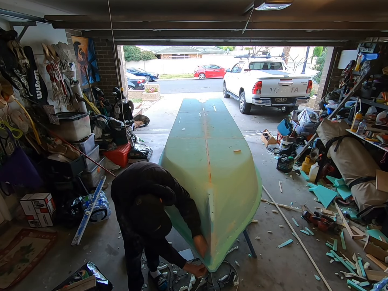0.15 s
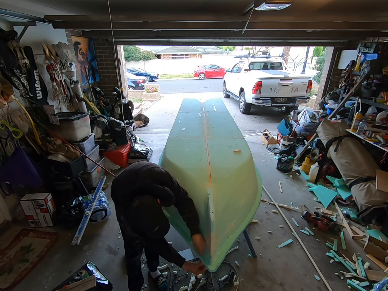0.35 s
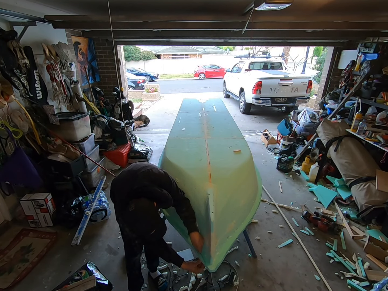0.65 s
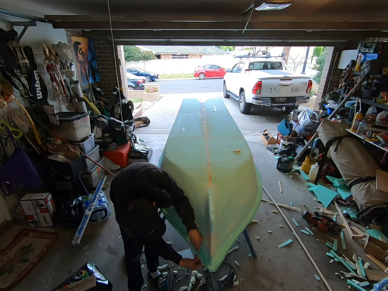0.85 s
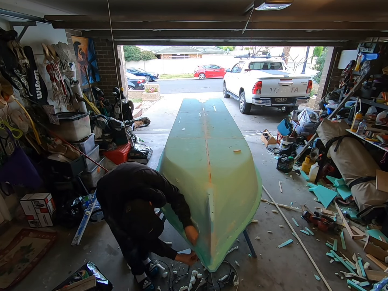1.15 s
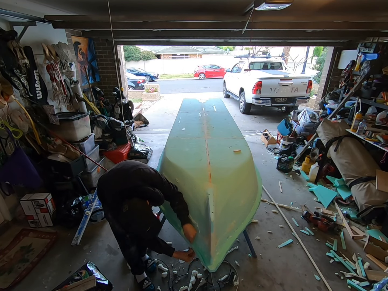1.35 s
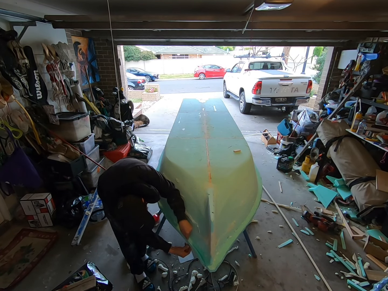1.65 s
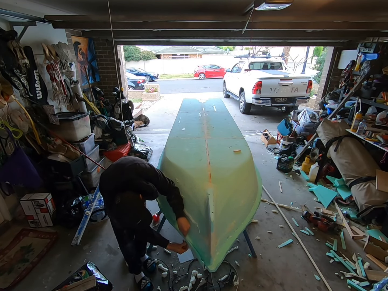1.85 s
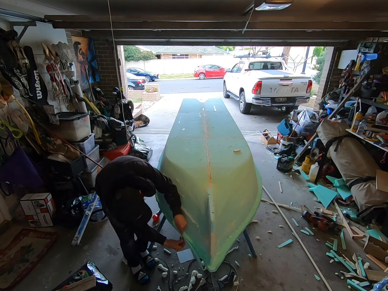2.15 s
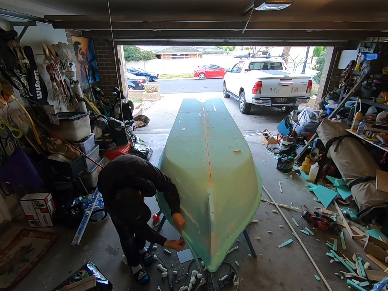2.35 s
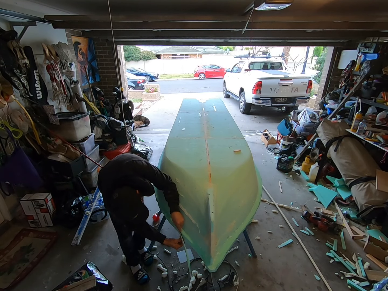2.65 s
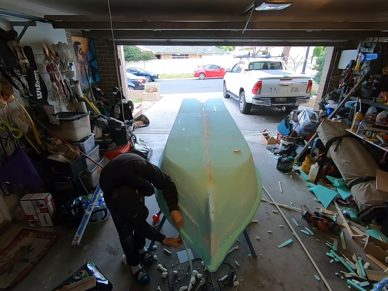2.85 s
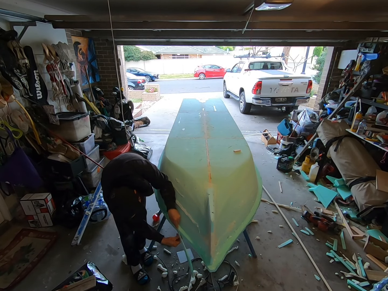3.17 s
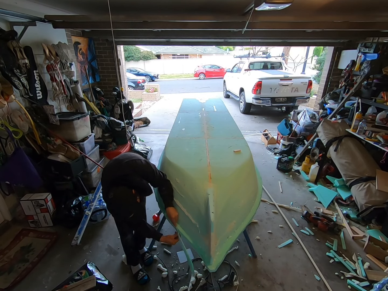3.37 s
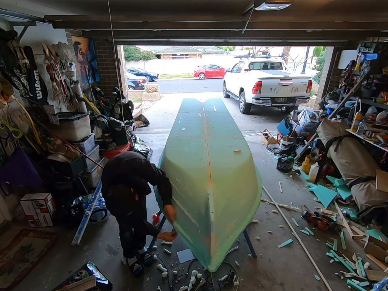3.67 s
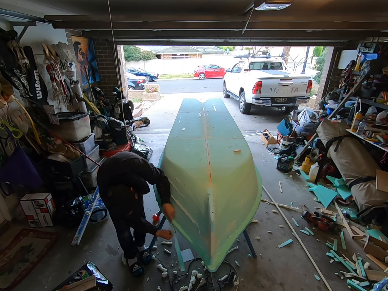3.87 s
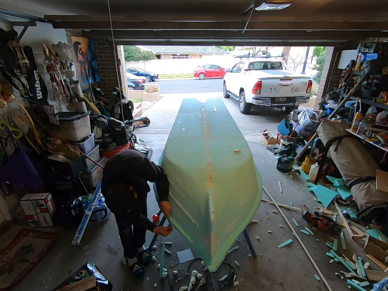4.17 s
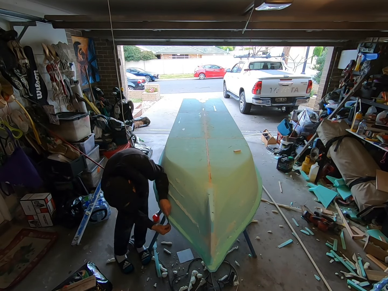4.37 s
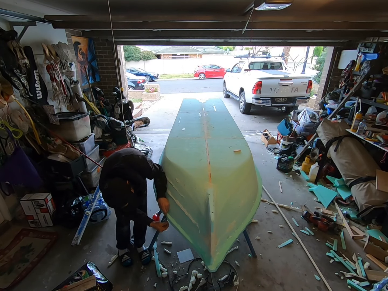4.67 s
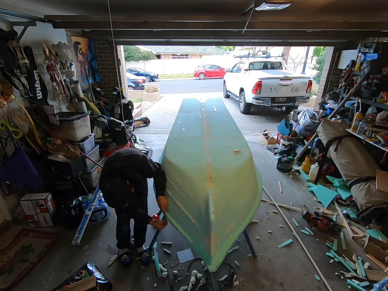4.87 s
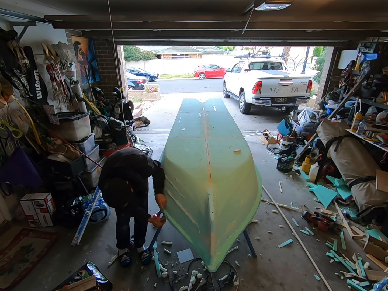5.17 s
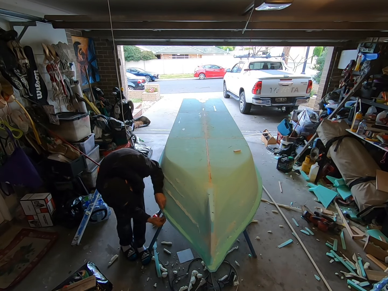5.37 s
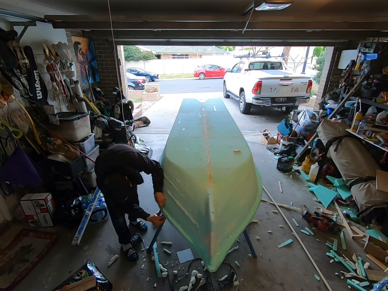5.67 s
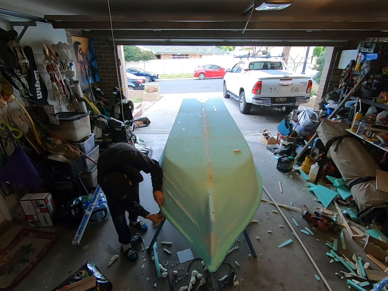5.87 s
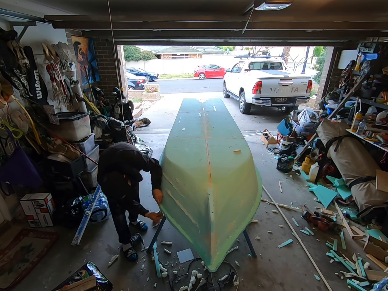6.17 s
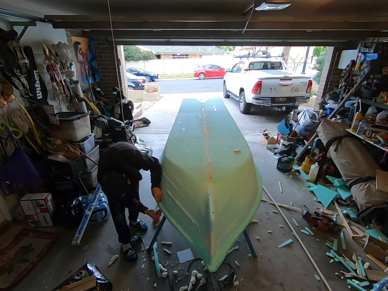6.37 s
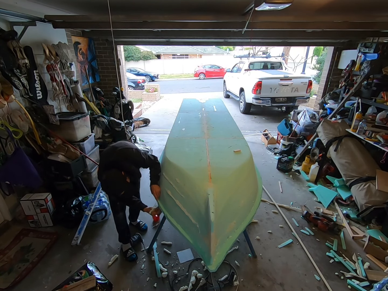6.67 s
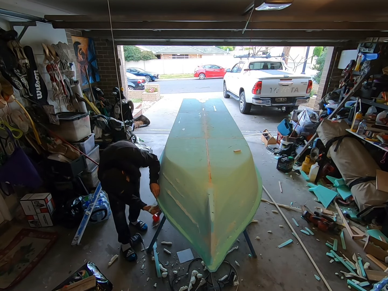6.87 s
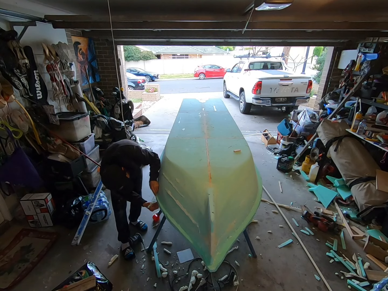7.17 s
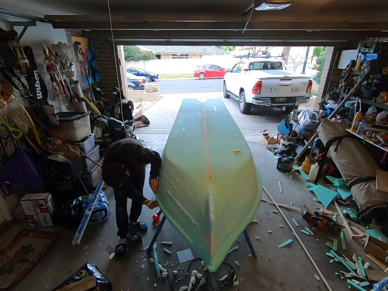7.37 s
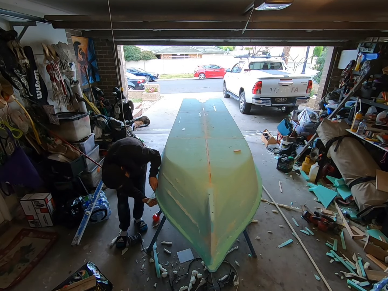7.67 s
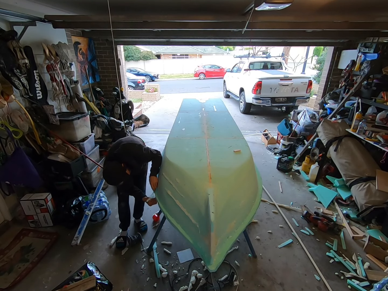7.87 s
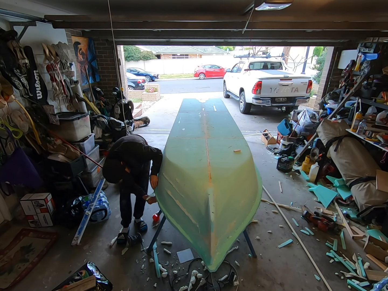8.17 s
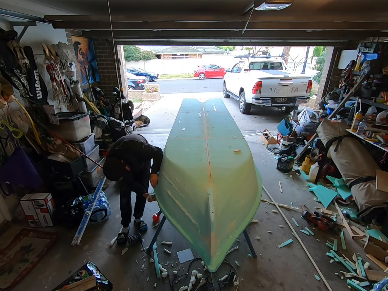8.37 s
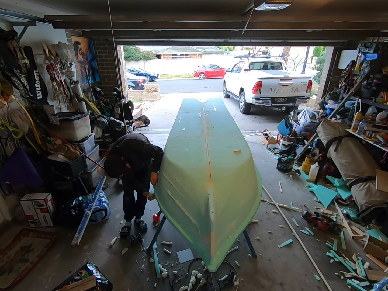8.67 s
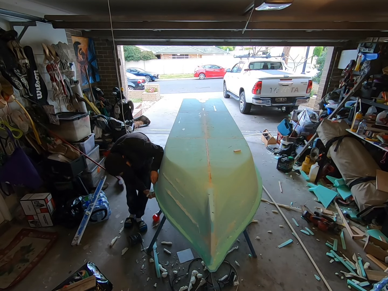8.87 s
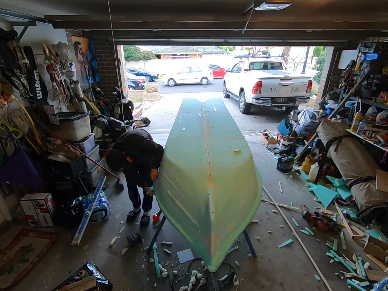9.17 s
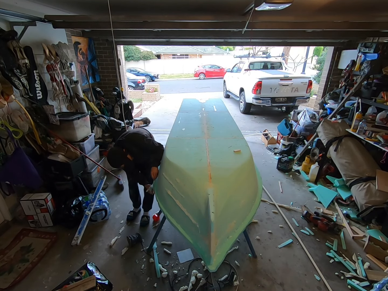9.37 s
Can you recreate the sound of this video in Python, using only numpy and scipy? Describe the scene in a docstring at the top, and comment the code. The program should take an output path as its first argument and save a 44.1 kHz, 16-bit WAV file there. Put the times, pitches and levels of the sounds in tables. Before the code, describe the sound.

A blade saws and scrapes dry rigid foam in quick raspy strokes, with squeaks and one sharp knock, ending in a long hollow scrape.

```python
"""A cluttered garage: a knife saws and scrapes the edge of an upturned foam hull, from the bow down the flank.
Strokes are noise ticks of bursting foam cells, shaped by blade force, that also ring hull, edge and glued seam.
A peeling shaving is a noise band gliding down; foam squeaks are jittered tones; knocks and dull bumps dot the work.
At last the blade lies flat: a long, hollow noise scrape swells over a low hum of three rough partials.
Short, dense echoes and a faint bed of air surround it all."""
import sys
import numpy as np
from scipy import signal
from scipy.fft import rfft, irfft, next_fast_len
from scipy.io import wavfile
from scipy.ndimage import uniform_filter1d, map_coordinates

SR = 44100
rng = np.random.default_rng(int(sys.argv[2]) if len(sys.argv) > 2 else 0)


def wav_record(signal):
    """Record a signal, one row per channel, as 16-bit PCM in the file named by sys.argv[1]."""
    frames = np.transpose(np.atleast_2d(signal))
    bounded = np.clip(frames, -1, 1)
    # unit amplitude maps onto the largest positive 16-bit level
    quanta = np.round(bounded * 32767).astype(np.int16)
    wavfile.write(sys.argv[1], SR, quanta)


N = 420273
TIME = np.arange(N) / SR

# All levels below are mix levels, ahead of the final trim.
# saw strokes and the hardest bites: [start_s, end_s, level_db, brightness_db]
STROKES = [(0,0.034,-43,-10),(0.143,0.165,-44.5,8),(0.202,0.243,-46,-5),(0.339,0.365,-45.5,-18),(0.393,0.414,-42.5,-10),(0.431,0.449,-41.5,-2),(0.491,0.524,-47.5,-14),(0.532,0.56,-39,4),(0.56,0.591,-41.5,-19),(0.61,0.622,-43,-22),(0.631,0.662,-46.5,-20),(0.713,0.724,-42,-3),
           (0.806,0.84,-44.5,-4),(0.962,1.028,-43,11),(1.055,1.085,-46.5,-13),(1.153,1.215,-41,10),(1.713,1.802,-41.5,6),(1.884,1.945,-43.5,-3),(1.974,2.042,-41,-4),(2.07,2.117,-41.5,11),(2.161,2.211,-38.5,-1),(2.274,2.306,-45,7),
           (2.48,2.545,-42.5,-6),(2.546,2.597,-45.5,-3),(2.72,2.74,-49.5,-4),(2.814,2.848,-44.5,-2),(2.886,2.927,-45.5,-6),(2.969,3.01,-44.5,3),(3.042,3.28,-43,4),(3.345,3.408,-42.5,5),
           (3.446,3.487,-38.5,1),(3.556,3.711,-41.5,4.5),(3.706,3.776,-37.5,4),(3.825,3.898,-44.5,5),(3.983,4.153,-40.5,3),
           (4.042,4.081,-35,13),(4.21,4.272,-43,0),(4.45,4.56,-41,4),(4.562,4.673,-40.5,-4),(4.803,4.822,-46,4),(4.863,5.093,-45.5,6),
           (5.115,5.189,-43,3),(5.224,5.27,-38.5,-5),(5.355,5.413,-39,13.5),(5.764,5.799,-42.5,0),(5.829,5.896,-45,-7),
           (5.924,5.963,-41.5,-3),(6.053,6.075,-41,0),(6.085,6.165,-46,-3),(6.186,6.241,-39,-3.5),(6.319,6.382,-40,-2),(6.383,6.46,-46,-5),(6.489,6.543,-43,-2),
           (6.697,6.726,-44.5,0),(6.76,6.797,-46.5,-10),(6.846,6.888,-46,-4),(6.935,7.003,-44,-3),(7.054,7.112,-47.5,3),(7.153,7.184,-47,6),(7.223,7.3,-51.5,8),
           (7.437,7.512,-34.5,23),(7.652,7.697,-40,3),(7.742,7.82,-47.5,-6),(8.05,8.114,-49.5,5),(8.142,8.22,-47,-5),(8.29,8.485,-47,-5),(9.164,9.19,-40,18)]
# steady pressure of the blade under the strokes: [time_s, level_db]
DRAG = [(0,-46),(.6,-46),(1.1,-43.5),(1.55,-42),(2.1,-44.5),(2.36,-50),(2.9,-49.5),(3.3,-46.5),(4.15,-47.5),(4.55,-48.5),(5.1,-48),(5.6,-50.5),(7.4,-46),(7.75,-48),(7.97,-61),(8.25,-47.5),(8.55,-48.5),(8.85,-43),(9.53,-44)]
# the blade stops or lifts between strokes: [middle_s, half_length_s]
RESTS = [(0.071,0.028),(0.377,0.0083),(.182,0.0045),(0.271,0.0042),(0.768,0.0095),(2.384,0.01),(2.437,0.024),(2.632,0.017),(2.701,0.029),(3.023,0.011),(3.427,0.01),(3.53,0.038),(3.81,0.025),(3.935,0.014),(4.701,0.028),(4.79,0.048),(5.206,0.0075),(5.488,0.041),(5.56,0.022),(5.728,0.054),(5.814,0.0098),(6.267,0.03),(6.624,0.014),(6.67,0.013),(6.743,0.0083),(6.91,0.013),(7.044,0.015),(7.202,0.011),(7.536,0.022),(7.628,0.011)]
# where the blade is: [time_s, bow_share (1 at the bow, 0 on the flank)]
AT_BOW = [(0,0.99),(2.08,0.83),(2.42,0.27),(3.5,0.46),(4.2,0.02)]
# bending resonance of the growing shaving: [time_s, pitch_hz, gain_db over the cut]
SHAVING = [(.7,4600,-14),(.8,4000,-5),(.9,3720,6),(1.05,3120,11),(1.17,2570,10),(1.3,2240,7),(1.42,1910,9),(1.56,1590,5),(1.85,1170,8),(2.05,1010,7),(2.25,950,-20)]
# ring of the thin edge being trimmed: [time_s, pitch_hz, gain_db over the cut]
EDGE = [(2.1,2050,-2),(2.5,2010,2),(4.05,2040,6.5),(5.2,2140,6),(6.3,2140,7),(7.3,2200,-1),(8.1,2150,-12)]
# crunch of hard glue in the seam at the bow: [time_s, gain_db over the cut]
GLUE = [(0,5.5),(.62,5),(.8,2),(1.05,-5),(1.4,-11.5),(2.2,-39)]
# squeaks and creaks of gripped foam: [start_s, end_s, level_db, first_pitch_hz, last_pitch_hz, scatter_share]
SQUEAKS = [(0.214,0.222,-32,5630,4880,0.084),(.816,0.84,-36.5,3550,3230,0.14),(1.058,1.085,-41,2850,3070,.1),(3.133,3.197,-40.5,9200,5650,0.14),(3.172,3.253,-37.5,3290,4730,.2),(4.009,4.027,-26.5,8200,5120,0.13),(5.48,5.496,-48.5,557,480,0.041),(6.885,7.237,-66.5,297,268,0.122),(7.427,7.495,-33,5810,5570,0.085),(7.438,7.503,-32,7040,7540,0.27),(9.393,9.531,-42.5,2870,2766,0.12)]
# sharp contacts of the blade: [time_s, level_db, t60_s]
KNOCKS = [(.333,-37.5,0.063),(2.15,-32.5,0.08),(2.474,-39,.081),(3.449,-34,0.047),(4.967,-35,.06),(5.621,-25.5,0.12),(5.716,-40.5,0.076),(5.767,-41,0.049),(5.919,-38,.07),(6.055,-39,0.08)]
# dull bumps on the hull: [time_s, level_db, pitch_hz]
BUMPS = [(0.341,-39.5,200),(1.04,-42,213),(1.075,-49,286),(1.129,-41,183),(3.184,-57,197),(4.011,-51,290),(4.07,-52,240),(5.72,-57,200),(7.215,-60,195),(7.429,-56,215),(8.249,-54,190),(8.534,-54,88)]
# the long last scrape, with the blade laid flat: [time_s, level_db]
SCRAPE = [(7.8,-61.5),(8.2,-50.5),(8.55,-48.5),(8.78,-41),(9.05,-38.5),(9.29,-31),(9.38,-33),(9.45,-42.5),(9.53,-43)]
# the low hum that swells with it: [time_s, level_db, pitch_hz, third_partial_db over the first]
HUM = [(8.1,-89,194.3,-20),(8.43,-58,198,-8),(8.53,-67,199.5,-8),(8.72,-42,197.5,-15),(8.82,-55.5,200.7,3),(9.05,-60.5,200.7,11),(9.14,-42,206.3,0.5),(9.36,-39,202.7,-23),(9.41,-51,202,-17),(9.53,-45,200.2,-8)]

# resonances of the hull at the bow, on the flank and deep down: [pitch_hz, width_hz, level_db]
BOW_MODES = [(658,39,-7),(790,81,-8.5),(889.6,41,8),(976,200,-10),(1143,25,-3)]
FLANK_MODES = [(488,35.5,-6),(559,56,-5),(659.3,25.7,4),(826,82,-6.5),(868,58,-4.5)]
DEEP_MODES = [(79.4,10,-10.5),(147,30,-4.5),(193.4,31,-0.5),(253,35,-4.5),(308.4,19,-2)]
# resonances of the blade's steel and of the glued seam: [pitch_hz, width_hz, level_db]
BLADE_MODES = [(3040,140,1),(3900,110,1),(5060,90,-2),(5950,180,0),(7440,130,-2),(10600,220,-5)]
SEAM_MODES = [(1413,23,0.5),(1650,51,-19),(2120,90,-1),(4310,22,1.5)]

# spectra of cut, glue, knock, bump, flat scrape and room air: [frequency_hz, density_db per Hz]
RASP = [(60,-46),(370,-41),(480,-21),(1000,-7),(1550,-9),(1820,-8.5),(2000,-1.5),(2350,-4.5),(3200,-2),(4200,-1.5),(5000,-2),(6200,-2),(8000,-2.5),(15500,-8.5)]
CRUNCH = [(300,-24.5),(580,0),(800,7.5),(1150,2),(1450,0),(1750,1.5),(2200,-7.5),(2700,-2.5),(5500,-6.5),(15000,-45)]
CRACK = [(60,-36),(200,-14),(900,-4),(2100,5),(4200,10.5),(7000,5.5),(15500,5)]
THUD = [(30,-8),(100,-17),(190,6.5),(320,4),(500,-20),(1500,-29),(5000,-80)]
FLAT = [(40,-32),(100,-22),(370,-18),(510,-9),(730,1),(900,-2),(1170,-12),(1400,-8.5),(1750,-15),(2100,-10),(2400,-13),(2950,-6),(3450,-10.5),(4000,-7.5),(4600,-11),(6000,-18),(15500,-40)]
AIR = [(25,-13),(80,-5.5),(200,-1),(380,-3.5),(700,6),(1400,-3),(4000,-9.5),(15000,-29)]
# echo decay in the garage: [frequency_hz, t60_s]
GARAGE = [(200,0.32),(1000,0.091),(5000,0.069),(15000,0.045)]
# left-right likeness of echoes and air: [frequency_hz, correlation]
ALIKE = [(30,.3),(180,0.9),(350,0.47),(520,0.65),(700,0.97),(1200,0.69),(2500,0.027),(8000,0.097),(13000,0.34)]

# a stroke rises over BITE_S plus a share of its length, and dies fast
BITE_S, BITE_SHARE, RELEASE_S = 0.0082, 0.043, 0.009
ARCH_DB = 3.5  # mid-stroke, where the blade is fastest, over either end
REST_DB, REST_DB_PER_S = -5.5, -87  # fall of the drag in a rest; further per second of half length
REST_DULL = 0.22  # dB of brightness lost per dB that the drag lets up
BOW_BRIGHT_DB = -4  # the firm cut at the bow is duller
EASY_CUT_DB = -45  # reference force for the hull's ring
FLANK_RING_DB, BOW_RING_DB = -59.5, -45.5  # ring under an easy cut, at either place
FLANK_DRONE_DB, BOW_DRONE_DB = -77.5, -66  # deep modes, likewise
SCRAPE_DRONE_DB = -18  # deep modes relative to the last scrape
# dB of ring per dB of effort and per dB of brightness: a dull stroke presses harder
RING_GROWS, RING_PER_BRIGHT = 0.62, -0.44
FLAT_FROM_S, FLAT_RING_DB = 8.1, -14  # laid flat, the blade rings the hull less
BLADE_UNTIL_S, BLADE_RING_DB = 8.66, -6.5  # as it is laid over, the steel sings for a while
SHAVING_WIDTH, EDGE_WIDTH = 0.063, 0.045  # half widths as shares of the pitch
# dark band above the shaving: centre over its pitch, width share, depth share
SHADOW_RATIO, SHADOW_WIDTH, SHADOW_DEPTH = 1.32, 0.15, 0.43
BUMP_TONE = 0.61  # gain of the hull's note in a bump
HUM_SECOND_DB = -15  # second partial relative to the first
HUM_ROUGH_DB, HUM_JITTER = 1.7, 0.009  # unsteadiness of level (dB) and pitch (share)
ECHO_BUILD_S = 0.0012  # time the echoes take to thicken
TOP_HZ = 15800  # band limit


def amp(db):
    """Decibels to gain."""
    return 10 ** (np.asarray(db) / 20)


def unit(x):
    """Scale to rms 1."""
    return x / np.sqrt(np.mean(x ** 2) + 1e-20)


def along(points, hz):
    """Read [frequency_hz, value] points on a log frequency axis."""
    f, v = np.transpose(points)
    return np.interp(np.log(hz + 1), np.log(f + 1), v)


def curve(rows, at=TIME, axis=1):
    """One column of a table, joined by straight lines in time."""
    cols = np.transpose(rows)
    return np.interp(at, cols[0], cols[axis])


def wobble(rate):
    """A smooth random curve with `rate` knots a second."""
    knots = rng.standard_normal(int(N * rate / SR) + 4)
    return map_coordinates(knots, [TIME * rate], order=2)


def filtered(x, response):
    """Filter x by a complex response of frequency."""
    size = next_fast_len(N + SR // 2)
    spectrum = rfft(x, size) * response(np.fft.rfftfreq(size, 1 / SR))
    return irfft(spectrum, size)[..., :N]


def coloured(x, spectrum):
    """Give white input a spectrum and keep its power."""
    return filtered(x, lambda hz: unit(amp(along(spectrum, hz))))


def rung(x, modes):
    """Pass white input through resonances of alternating sign and keep its power."""
    def response(f):
        total = 0
        for k, (centre, width, db) in enumerate(modes):
            damping = 1j * f * width
            total = total + (-1) ** k * amp(db) * damping / (centre * centre - f * f + damping)
        return total / np.sqrt(np.mean(abs(total) ** 2))
    return filtered(x, response)


def gliding(x, rows, width):
    """Pass x through a resonance that follows a table of [time_s, pitch_hz, gain_db]."""
    hz, t, z = signal.stft(x, SR, nperseg=1024, noverlap=768)
    ratio = hz[:, None] / curve(rows, t)
    z = z * amp(curve(rows, t, axis=2)) / (1 + ((ratio - 1) / width) ** 2)
    return signal.istft(z, SR, nperseg=1024, noverlap=768)[1][:N]


def gate(start, end, rise, fall):
    """The blade bites, travels and lets go: a linear rise centred on start, an exponential fall."""
    return np.clip((TIME - start) / rise + .5, 0, 1) * np.exp(-np.maximum(TIME - end, 0) / fall)


def cells(rate, spread_db, hiss):
    """Foam cells bursting: dense ticks of uneven size over a fine hiss, rms 1."""
    bursts = rng.random(N) < rate / SR
    ticks = bursts * rng.standard_normal(N) * amp(spread_db * rng.standard_normal(N))
    return unit(unit(ticks) + hiss * rng.standard_normal(N))


def patchy(x, depth_db):
    """Each crumb of foam has its own colour: random gain over patches of time and pitch."""
    z = signal.stft(x, SR, nperseg=256)[2]
    field = uniform_filter1d(rng.standard_normal(z.shape), size=4, axis=0)
    field = uniform_filter1d(field, size=12, axis=1)
    return unit(signal.istft(z * amp(depth_db * unit(field)), SR, nperseg=256)[1][:N])


def effort(bow):
    """Cut strength and brightness (dB): arched strokes over a drag that lets up and dulls in the rests."""
    rest_db = 0
    for middle, half in RESTS:
        rest_db = rest_db + (REST_DB + REST_DB_PER_S * half) * np.exp(-((TIME - middle) / half) ** 4)
    power = amp(curve(DRAG) + rest_db) ** 2
    bright = power * REST_DULL * rest_db  # brightness weighted by power
    for start, end, db, bright_db in STROKES:
        length = end - start
        arch = np.sin(np.pi * np.clip((TIME - start) / length, 0, 1)) - 2 / np.pi
        shape = gate(start, end - RELEASE_S, BITE_S + BITE_SHARE * length, RELEASE_S)
        stroke = (amp(db + ARCH_DB * arch) * shape) ** 2
        power += stroke
        bright += stroke * bright_db
    return np.sqrt(power), bright / power + BOW_BRIGHT_DB * bow


def cut_foam(force, bright_db, bow):
    """Stick and slip bursts the cells: patchy noise whose low and high parts tilt with brightness."""
    force_grain = force * patchy(cells(rate=11000, spread_db=1.2, hiss=.9), depth_db=1.7)
    rasp = coloured(force_grain, RASP)
    low = filtered(rasp, lambda hz: 1 / (1 + (hz / 5200) ** 4))
    high = rasp - low
    return low * amp(-.4 * bright_db - 1.84 * bow) + high * amp(0.2 * bright_db)


def trimmed_edge(force, bright_db):
    """The thin edge rings in one narrow, drifting band, more under a dull stroke."""
    push = force * amp(-.3 * bright_db + 2 * wobble(11))
    return gliding(push * rng.standard_normal(N), EDGE, EDGE_WIDTH)


def blade_steel(force):
    """The blade's own resonances sing while it is being laid over."""
    push = force * gate(FLAT_FROM_S, BLADE_UNTIL_S, rise=.1, fall=0.11)
    return amp(BLADE_RING_DB) * rung(push * rng.standard_normal(N), BLADE_MODES)


def glued_seam(force):
    """Hard glue breaks in sparser ticks that crunch and ring the seam."""
    grit = cells(rate=1300, spread_db=2.5, hiss=.7)
    glue = force * amp(curve(GLUE) + 1.1 * wobble(71.3)) * grit
    return amp(-1.0) * coloured(glue, CRUNCH) + amp(-9.0) * rung(glue, SEAM_MODES)


def hull_ring(force, bright_db, bow):
    """The cut shakes the hull: its modes cross from bow to flank over a deep, unsteady drone."""
    load = (force / amp(EASY_CUT_DB)) ** RING_GROWS
    ring_db = FLANK_RING_DB * (1 - bow) + BOW_RING_DB * bow + RING_PER_BRIGHT * bright_db
    ring_db = ring_db + FLAT_RING_DB * (TIME > FLAT_FROM_S) + 2.5 * wobble(18)
    push = load * amp(ring_db) * cells(rate=3000, spread_db=-2.5, hiss=0.97)
    ring = rung(push * np.sqrt(bow), BOW_MODES) + rung(push * np.sqrt(1 - bow), FLANK_MODES)
    sway = load * amp(FLANK_DRONE_DB * (1 - bow) + BOW_DRONE_DB * bow)
    sway = sway + amp(SCRAPE_DRONE_DB + curve(SCRAPE))
    return ring + rung(sway * amp(3.1 * wobble(20)) * rng.standard_normal(N), DEEP_MODES)


def shaving(rasp, force):
    """The peeling strip rustles in a band that glides down as it grows, and dulls the rasp just above."""
    hz, t, z = signal.stft(rasp, SR, nperseg=1024)
    ratio = hz[:, None] / curve(SHAVING, t)
    size = amp(curve(SHAVING, t, axis=2))
    dip = np.exp(-((ratio / SHADOW_RATIO - 1) / SHADOW_WIDTH) ** 2)
    shadow = 1 - SHADOW_DEPTH * np.minimum(size / 2, 1) * dip
    dulled = signal.istft(z * shadow, SR, nperseg=1024)[1][:N]
    attached = TIME < SHAVING[-1][0]
    crumbs = patchy(rng.standard_normal(N), depth_db=1.5)
    return dulled + gliding(force * crumbs * attached, SHAVING, SHAVING_WIDTH)


def cutting():
    """One blade force drives the foam, edge, steel, glue, hull and shaving together."""
    bow = np.clip(curve(AT_BOW), 0, 1)
    force, bright_db = effort(bow)
    # stick and slip: slow and fast flutter of the force
    force = force * amp(0.62 * wobble(45) + (0.87 + 0.33 * bow) * wobble(220))
    rasp = amp(1.96) * cut_foam(force, bright_db, bow)
    struck = trimmed_edge(force, bright_db) + blade_steel(force) + glued_seam(force)
    return shaving(rasp, force) + struck + hull_ring(force, bright_db, bow)


def squeaks():
    """Fast, uneven slips build up to a gliding tone with an overtone and hiss; little sounds below it."""
    out = np.zeros(N)
    hiss = coloured(rng.standard_normal(N), [(500, -31), (2000, -40), (5000, 13)])
    for start, end, db, first_hz, last_hz, scatter in SQUEAKS:
        pitch = np.interp(TIME, [start, end], [first_hz, last_hz]) * np.exp(scatter * wobble(3000))
        phase = 2 * np.pi * np.cumsum(pitch) / SR
        tone = np.sin(phase) + 0.4 * np.sin(2 * phase) + 0.33 * hiss
        squeak = amp(db) * unit(tone) * gate(start, end - .005, rise=0.73 * (end - start), fall=0.003)
        lowcut = signal.butter(4, .6 * min(first_hz, last_hz), "high", fs=SR, output="sos")
        out += signal.sosfilt(lowcut, squeak)
    return out


def knocks():
    """The blade snaps through a hard spot: a crack and a short crunch of decaying noise."""
    blows = np.zeros(N)
    for s, db, t60 in KNOCKS:
        age = np.maximum(TIME - s, 0)
        crunch, crack = amp(-60 * age / t60), 0.52 * np.exp(-age / 0.00095)
        blows += amp(db) * (crunch + crack) * (TIME >= s)
    return coloured(blows * cells(rate=12000, spread_db=1.5, hiss=1), CRACK)


def bumps():
    """Soft blows that the light hull damps at once: a noise thud with a brief low note."""
    blows, notes = np.zeros(N), np.zeros(N)
    for s, db, hz in BUMPS:
        blow = amp(db) * gate(s, s + 0.0088, rise=0.0082, fall=0.012)
        blows += blow
        notes += blow * np.sin(2 * np.pi * hz * (TIME - s))
    return 0.95 * coloured(blows * rng.standard_normal(N), THUD) + BUMP_TONE * notes


def last_scrape():
    """Flat steel over foam cells: a smooth, hollow rush, faint at first, swells late and fades."""
    grain = patchy(cells(rate=10000, spread_db=2.0, hiss=0.86), depth_db=1.5)
    return amp(curve(SCRAPE)) * coloured(grain, FLAT)


def hum():
    """The flat blade sets the hull humming: three partials, rough in level and unsteady in pitch."""
    pitch = curve(HUM, axis=2) * (1 + HUM_JITTER * wobble(50))
    phase = 2 * np.pi * np.cumsum(pitch) / SR
    tone = np.zeros(N)
    for k, db in enumerate([0, HUM_SECOND_DB, curve(HUM, axis=3)], 1):
        tone += amp(db + HUM_ROUGH_DB * wobble(40)) * np.sin(k * phase)
    return amp(curve(HUM) + 1.5) * tone * (TIME > HUM[0][0])


def spread(pair):
    """Mix two unrelated signals to a left and right of set likeness at each frequency."""
    def mid_side(hz):
        turn = np.arccos(np.clip(along(ALIKE, hz), -1, 1)) / 2
        return np.array([np.cos(turn), np.sin(turn)])
    mid, side = filtered(pair, mid_side)
    return np.array([mid + side, mid - side])


def garage(x, count=36):
    """Dense, short echoes off floor, hull and clutter: decaying noise tails that crossfade over time."""
    echoes, travel = np.zeros((2, N + SR)), np.linspace(0, count - 1, N)
    for place in range(count):
        hz, t, z = signal.stft(rng.standard_normal((2, SR // 4)), SR, nperseg=256)
        decay = amp(-60 * t / along(GARAGE, hz)[:, None])
        tail = signal.istft(z * decay, SR, nperseg=256)[1]
        tail = tail * (1 - np.exp(-TIME[:tail.shape[1]] / ECHO_BUILD_S))
        tail = tail / np.linalg.norm(tail, axis=1, keepdims=True)
        first, last = np.searchsorted(travel, [place - 1, place + 1])
        near = np.sqrt(np.maximum(1 - abs(travel[first:last] - place), 0))
        answer = signal.fftconvolve((near * x[first:last])[None], tail, axes=1)
        echoes[:, first:first + answer.shape[1]] += answer
    colour = [(250, -9.5), (800, -10.5), (2000, -1.0), (8000, -3.0)]  # echo gain: frequency_hz, gain_db
    return spread(filtered(echoes[:, :N], lambda hz: amp(along(colour, hz))))


def room_air():
    """The faint air of the open garage: steady, wide coloured noise."""
    return amp(-61.0) * spread(coloured(rng.standard_normal((2, N)), AIR))


def scene():
    """The work with its flickering treble, the hum, the echoes and the air."""
    work = cutting() + squeaks() + knocks() + bumps() + last_scrape()
    # the treble flickers from side to side
    treble = filtered(work, lambda hz: 1 - 1 / (1 + (hz / 1700) ** 4))
    aside = amp(-6.5) * wobble(300) * treble
    heard = work + hum() + np.array([aside, -aside]) + garage(work)
    return amp(-3.0) * heard + room_air()


def record(dry):
    """Keep nothing above the band limit."""
    return filtered(dry, lambda hz: hz < TOP_HZ)


dry = scene()
out = record(dry)
wav_record(out)
```